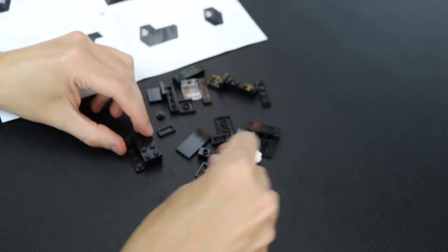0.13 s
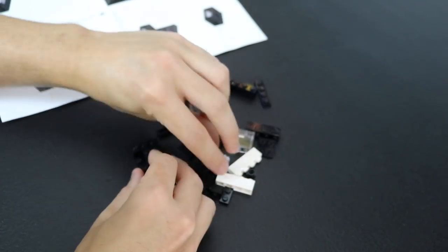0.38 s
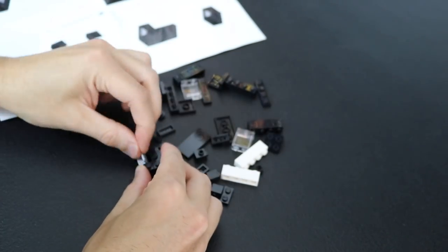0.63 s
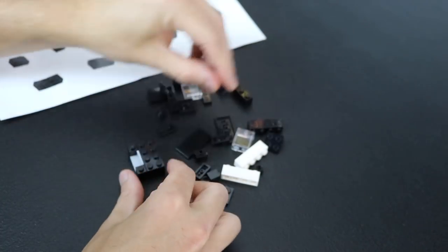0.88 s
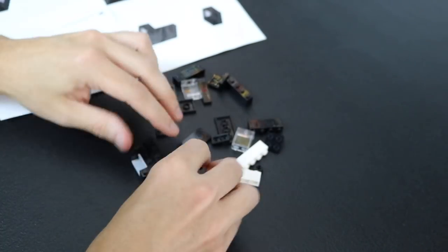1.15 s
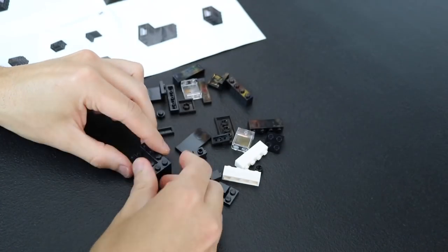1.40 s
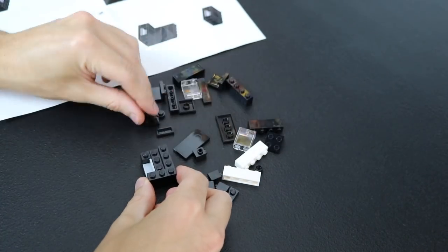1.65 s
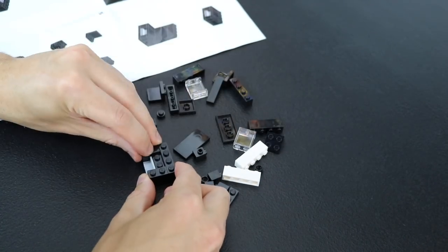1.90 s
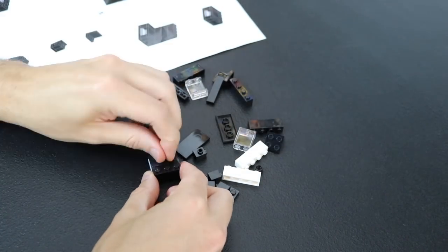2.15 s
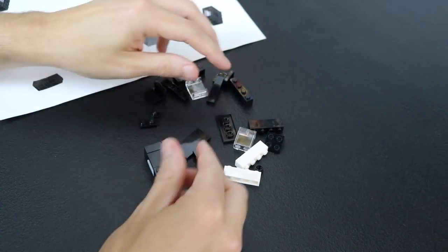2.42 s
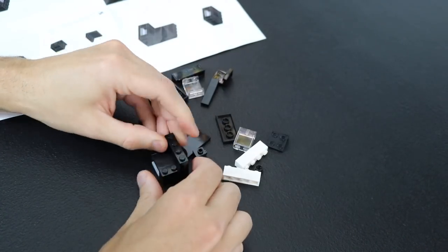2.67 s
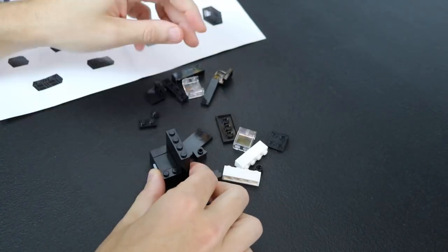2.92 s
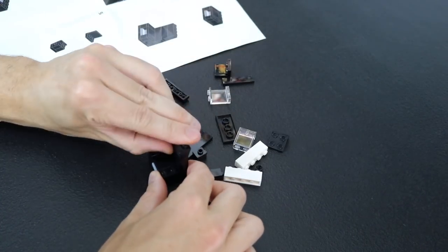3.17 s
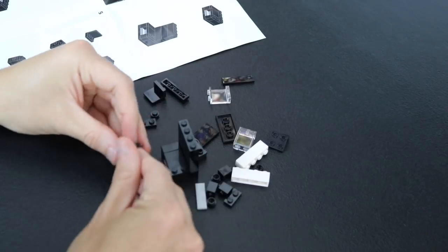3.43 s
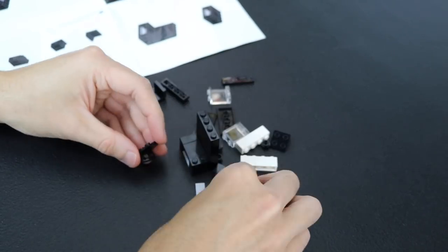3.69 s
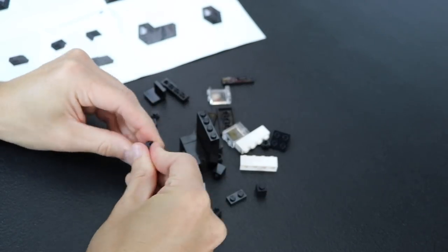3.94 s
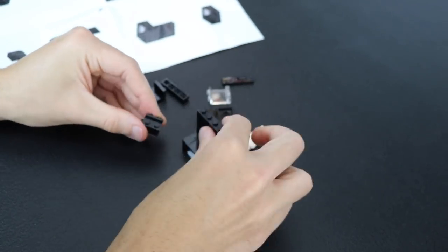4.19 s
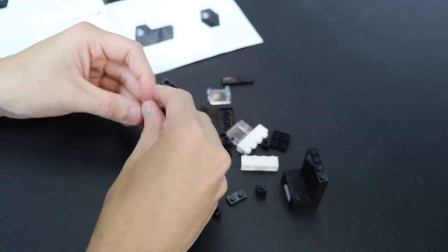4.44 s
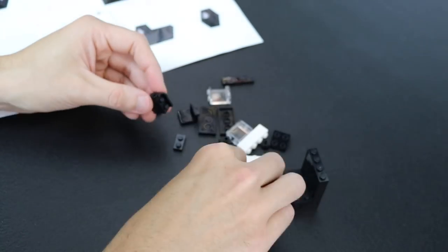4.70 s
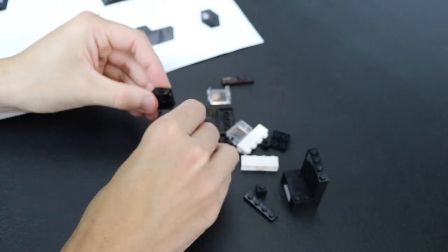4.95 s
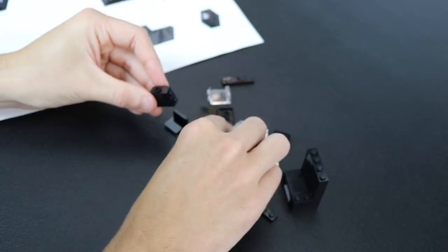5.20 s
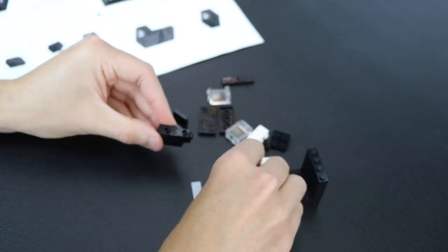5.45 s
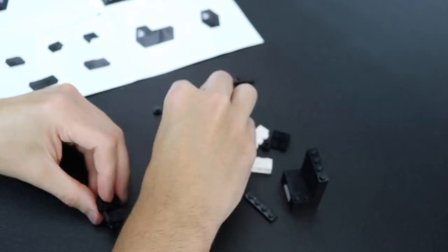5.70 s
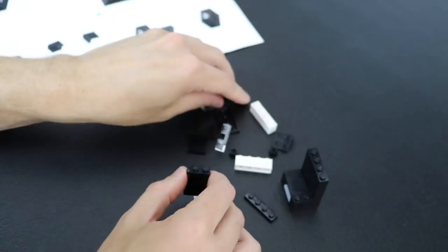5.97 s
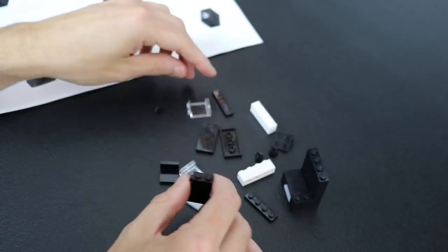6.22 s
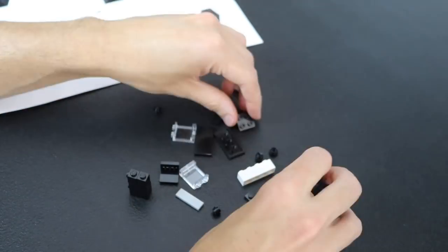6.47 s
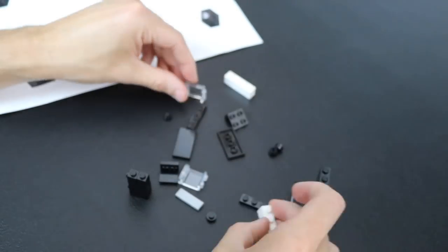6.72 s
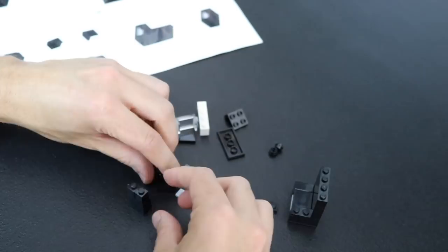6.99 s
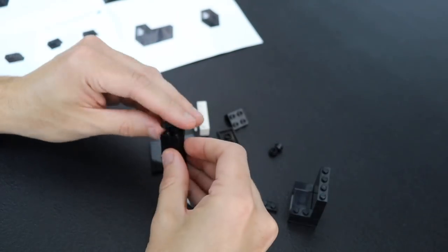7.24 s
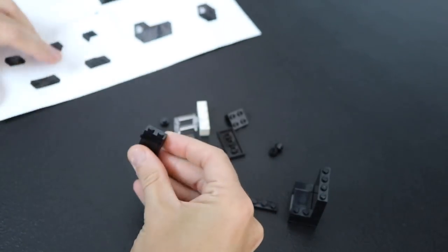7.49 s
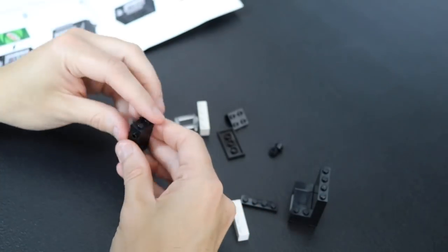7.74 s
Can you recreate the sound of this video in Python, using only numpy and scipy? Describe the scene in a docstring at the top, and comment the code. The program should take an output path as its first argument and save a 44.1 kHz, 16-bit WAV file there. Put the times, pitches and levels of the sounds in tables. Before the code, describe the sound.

Small hollow plastic bricks are handled on a desk, close to one microphone in a quiet room with soft hiss and low rumble. From 0 to 1 s there are faint scrapes and light knocks. At 1.13 s a loud, desk-heavy slam hits, with another clack and soft hand thud near 1.4 s. Weak ticks and short rubs follow, with a snap at 2.6 s. Scraping thickens around 3.1 s, then a cluster of loud clacks at 3.6-3.7 s. Sparse snaps come at 4.5, 5.0 and 5.35 s. A strong knock at 5.95 s with a faint hollow drag hum opens a dense rattle of scrapes, quick bright ticks and clacks until 7 s. After a lull, a piercing, very bright snap lands at 7.47 s, then paper rustles at 7.6 s and its corner taps at 7.7 s. Rings and scrapes cut off abruptly at frequent time jumps; hiss continues.

```python
"""Soft scrapes and small knocks come first, then loud slams and snaps scattered among weaker knocks and scrapes:
hands pick small plastic bricks from a pile, push them over a desk and snap them together, close to one microphone.
Every knock and scrape is a noisy force that rings modes of the hollow bricks and the desk top; thuds, hums and a
rustling page join in. The sound is speeded up by leaving pieces out: rings and scrapes break off at the jumps
while the quiet room hiss runs on."""
import sys
import numpy as np
from scipy import signal
from scipy.fft import rfft, irfft
from scipy.io import wavfile
from scipy.ndimage import uniform_filter1d

SR = 44100
rng = np.random.default_rng(int(sys.argv[2]) if len(sys.argv) > 2 else 0)


def generate_wav(sig):
    """Save sig (samples, or channels by samples) to the path in sys.argv[1] as 16-bit PCM at SR."""
    pcm = np.round(np.clip(np.atleast_2d(sig).T, -1, 1) * 32767).astype(np.int16)
    wavfile.write(sys.argv[1], SR, pcm)


def volts_from_decibels(level):
    """Turn decibel levels (scalar or array-like) into linear amplitude factors."""
    exponent = np.asarray(level, float) / 20
    return 10 ** exponent


N = 347067  # samples in the scene
SPAN = 16384  # samples in one ring
FLUTTER_DB = 2.5  # of scrapes and paper


def unit(x):
    """Scale so that the loudest 2 ms have rms 1."""
    return x / np.sqrt(uniform_filter1d(x ** 2, size=88).max())


def fall(t, t60):
    """Gain that drops 60 dB in t60."""
    return np.exp(-np.log(1000) * t / t60)


def walk(rate, count):
    """Random levels held 1 / rate s and slewed; spread near 1."""
    hold = int(SR / rate)
    levels = rng.standard_normal(count // hold + 1)
    return uniform_filter1d(np.repeat(levels, hold), hold)[:count]


def bank(modes):
    """Spectrum of each damped mode of an object."""
    hz, db, t60 = np.transpose(modes)[:, :, None]
    t = np.arange(SPAN) / SR
    return rfft(volts_from_decibels(db) * fall(t, t60) * np.sin(2 * np.pi * hz * t), axis=1)


def ring(force, spectra):
    """The force rings the object, each mode with the strength and sign of this contact point."""
    scatter_db = 3  # how differently each contact point drives the modes
    chance = rng.standard_normal((2, len(spectra)))
    strengths = volts_from_decibels(scatter_db * chance[0]) * np.sign(chance[1])
    return irfft(rfft(force, SPAN) * (strengths @ spectra))


def drive(force, spectra):
    """Ring the object with a steady force at unit gain, before the scatter of the contact point."""
    return ring(force, spectra) / np.sqrt(2 * np.sum(np.abs(spectra) ** 2) / SPAN)


def soften(force, desk_db):
    """Spread the force over a contact time: the more goes into the desk, the softer and longer it is."""
    soft_s_per_db = .00003
    return uniform_filter1d(force, size=1 + int(max(desk_db, 0) * soft_s_per_db * SR))


# Jumps in time, where whatever rings close to the microphone is cut off. Each entry: time in seconds.
JUMP_TIMES = [.658, .971, 1.067, 1.177, 1.194, 1.283, 1.49, 1.668, 1.771, 2.646, 2.79, 2.935, 3.163, 3.452,
              3.658, 3.671, 3.683, 4.115, 4.488, 4.705, 5.077, 5.332, 5.389, 6.023, 6.32, 6.419, 6.78,
              7.392, 7.476, 7.707]


def add(out, start_s, x):
    """Mix a sound in, broken off within a millisecond at the next jump."""
    i = int(start_s * SR)
    stop = min([s for s in JUMP_TIMES if s > start_s] + [N / SR])
    t = start_s + np.arange(min(len(x), N - i)) / SR
    out[i:i + len(t)] += x[:len(t)] * np.clip((stop - t) / .001, 0, 1)
    return out


# Modes of the desk top, then of the bricks: body, treble and topmost rings.
# Each row: frequency in Hz, relative level in dB (for bricks, before the low cut), 60 dB decay time in seconds.
DESK_MODES = [(146, -17.5, .08), (255, -8, 0.044), (352.7, 1, 0.047), (492, 1, 0.025), (606, 0.5, 0.029),
              (751.4, 3, 0.03), (1013, 5, 0.015), (1338, 1, 0.014), (1760, -7.5, .015)]
BODY_MODES = [(1810, -0.5, 0.003), (2182, -5, 0.00285), (2690, -2, .0035), (3145, 4.5, .006),
              (3420, -1.5, 0.01), (3840, 1, 0.0033), (4780, -0.5, 0.0044), (5550, -4.5, 0.0034),
              (6540, -9.5, 0.0027)]
TREBLE_MODES = [(7100, -6.5, .003), (7500, -0.5, 0.0028), (7850, 23.5, 0.0018), (9126, 7.5, 0.0061),
                (10100, -3.5, 0.002)]
TOP_MODES = [(11700, -8.5, .002), (12560, 4.5, .004), (12500, -2, 0.0026), (14000, -5.5, 0.0022),
             (15140, -9, 0.0025)]


def desk_and_brick_banks():
    """Small bricks radiate little below their low edge, so their modes pass a second-order low cut."""
    brick_low_hz = 446.6
    banks = [bank(m) for m in (DESK_MODES, BODY_MODES, TREBLE_MODES, TOP_MODES)]
    s = 1j * np.arange(SPAN // 2 + 1) * SR / SPAN / brick_low_hz
    low_cut = (s / (1 + s)) ** 2
    banks[1:] = [b * low_cut for b in banks[1:]]
    return banks


def blow(banks, levels_db):
    """Bricks chatter a few ms, then a rattle and room tail; the desk takes one clean push and the tail."""
    chatter_t60_s, tail_t60_s, treble_t60_s = 0.0061, 0.097, 0.081
    tail_db, desk_tail_db = -8, 1.5  # tail under the blow; desk's share of that tail
    t = np.arange(SPAN // 2) / SR
    noise = rng.standard_normal(len(t))
    tail = volts_from_decibels(tail_db) * fall(t, tail_t60_s) * noise
    chatter = fall(t, chatter_t60_s) * noise + tail
    push = 5 * np.exp(-t / 0.00005) + volts_from_decibels(desk_tail_db) * tail
    soft_push = soften(push, levels_db[0] - levels_db[1])
    treble = chatter * fall(t, treble_t60_s)  # the top dies sooner
    parts = zip((soft_push, chatter, treble, treble), banks, levels_db)
    return sum(volts_from_decibels(db) * unit(ring(force, b)) for force, b, db in parts)


# Blows of brick on brick or desk, close to the microphone.
# Each row: start in seconds, brick body level in dB, brick treble level in dB, desk level in dB.
BLOW_ROWS = [(0.1625, -30.5, -61, -52), (0.2504, -44, -56, -55), (0.2802, -30.5, -47, -30.5),
             (.3233, -45.5, -65, -41), (0.4358, -47, -48, -37), (0.4507, -26.5, -40, -30),
             (.5214, -29, -40, -59), (0.56, -40.5, -41.5, -39.5), (0.6279, -44, -64, -44),
             (.655, -42, -58, -45.5), (0.6985, -42.5, -59, -38.5), (.7212, -39.5, -53.5, -37.5),
             (.7885, -42.5, -43.5, -32.5), (.935, -39, -57, -34), (1.0508, -40, -44.5, -40.5),
             (1.1308, -14, -23.5, -4), (1.1448, -30, -21, -26), (1.1902, -43, -50.5, -52),
             (1.2606, -20, -31.5, -53), (1.3118, -47, -59, -34), (1.4047, -29, -20.5, -11),
             (1.4184, -20, -25.5, -21.5), (1.61, -50, -55, -58), (1.6317, -31, -36.5, -48),
             (1.6499, -29.5, -33.5, -59), (1.6943, -36, -55, -58), (1.8016, -33.5, -44, -61),
             (1.8322, -34.5, -46, -60), (1.8478, -32, -48.5, -56), (1.9472, -37, -54, -43),
             (1.9742, -39.5, -44, -34.5), (2.1051, -35, -67, -46), (2.4811, -45, -48, -32),
             (2.5643, -36, -60, -47), (2.594, -16, -24, -30.5), (2.606, -27.5, -29, -34.5),
             (2.7329, -54, -68, -32), (2.8459, -45.5, -58, -35.5), (2.933, -26.5, -52, -31),
             (3.0315, -37.5, -49, -32), (3.069, -26.5, -39, -40), (3.092, -37, -50, -37),
             (3.1387, -40, -52, -33), (3.1706, -37, -49, -30), (3.2097, -28, -47.5, -25),
             (3.3453, -55, -56.5, -36.5), (3.6177, -28, -34, -36.5), (3.6346, -11, -22, -20),
             (3.667, -33, -36.5, -50), (3.6802, -35, -40.5, -55), (3.691, -17, -27, -30),
             (3.7122, -22, -21, -32), (3.716, -15, -30, -24.5), (3.77, -25, -41, -43),
             (4.111, -45.5, -34, -64), (4.3934, -46.5, -48.5, -51), (4.4258, -35.5, -34, -48),
             (4.447, -35.5, -40.5, -52), (4.4838, -15.5, -28, -62), (4.6956, -31, -52, -45),
             (4.997, -16.5, -27.5, -33.5), (5.0138, -32, -40, -31.5), (5.0432, -26.5, -37.5, -39),
             (5.1562, -56, -48, -65), (5.3063, -27, -42, -37), (5.3271, -34, -42.5, -44),
             (5.343, -15, -19.5, -32.5), (5.366, -19, -31, -31.5), (5.95, -10.5, -30, -24),
             (6.084, -33.5, -41, -45), (6.0941, -24, -34, -37), (6.153, -37.5, -33, -45),
             (6.2346, -25, -47.5, -31), (6.2522, -21, -60, -42), (6.3561, -22, -36, -34),
             (6.4641, -37, -44, -50), (6.4782, -23, -44, -47), (6.5307, -37.5, -32.5, -40),
             (6.5475, -42, -57, -29), (6.5628, -32, -35, -40), (6.5765, -26.5, -31.5, -31),
             (6.589, -29.5, -30, -21), (6.7766, -31.5, -54, -48), (6.8971, -27, -48, -41),
             (6.9384, -16, -21, -34), (7.3893, -53, -28, -68), (7.4718, -19.5, -3.5, -35)]


def knocks(banks):
    """Each blow rings desk and bricks; the topmost ring grows faster than treble or desk level."""
    top_db, top_steepness = -1.5, 1.85  # from the treble
    slam_top_db, slam_steepness = -6.5, 3  # from a slam on the desk
    out = np.zeros(N)
    for start, body_db, treble_db, desk_db in BLOW_ROWS:
        from_treble_db = top_db + top_steepness * treble_db
        from_slam_db = slam_top_db + slam_steepness * desk_db
        add(out, start, blow(banks, (desk_db, body_db, treble_db, max(from_treble_db, from_slam_db))))
    return out


def skipping_piece(banks):
    """A tiny piece skips stud to stud over another: even, very bright ticks."""
    start_s, every_s, skips = 6.1031, .0096, 3
    desk_db, body_db, treble_db, top_db = -41, -22.5, -21.5, -18
    out = np.zeros(N)
    for k in range(skips):
        add(out, start_s + k * every_s, blow(banks, (desk_db, body_db, treble_db, top_db)))
    return out


# Scrapes over the desk and over other bricks.
# Each row: start in seconds, end in seconds, brick body level in dB at the start, at the end, desk dB above body.
SCRAPE_ROWS = [(.055, 0.092, -64.5, -70, 21), (0.119, 0.17, -64, -63, 9), (0.176, 0.268, -54, -63, 0.5),
               (0.435, 0.507, -43.5, -39, -7), (0.501, 0.581, -43.5, -55, -0.5), (.737, 0.79, -75, -72, 25),
               (0.788, 0.824, -55, -66, 16.5), (.918, 0.973, -57, -46, 4.5),
               (1.144, 1.177, -27, -30.5, -21), (1.199, 1.239, -43, -44, -7.5),
               (1.234, 1.28, -32.5, -40.5, -8), (1.355, 1.396, -57, -73.5, 10.5),
               (1.424, 1.487, -39.5, -51, 7.5), (1.563, 1.588, -59.5, -54.5, 9),
               (1.634, 1.663, -42, -53, 0.5), (1.696, 1.771, -35.5, -49.5, -16.5),
               (1.831, 1.866, -40.5, -51.5, -17), (1.937, 1.963, -47.5, -48, 0.5),
               (2.096, 2.156, -52.5, -51.5, 0), (2.521, 2.589, -50, -46, -1), (2.619, 2.645, -49, -42, -7),
               (2.654, 2.719, -66, -64, 14), (2.74, 2.79, -65.5, -62, 16.5), (2.85, 2.93, -62, -55, 12),
               (2.965, 3.01, -62, -71, 13), (3.055, 3.113, -42.5, -40.5, 1), (3.11, 3.164, -44, -46, 2),
               (3.258, 3.324, -54.5, -75.5, 10), (3.347, 3.449, -75, -51.5, -0.5),
               (3.572, 3.62, -43.5, -40.5, -6), (3.62, 3.654, -38.5, -45, -11),
               (3.659, 3.668, -40, -42, -1), (3.726, 3.77, -40.5, -39, 3), (3.77, 3.832, -38.5, -64, -10),
               (4.394, 4.479, -51.5, -52.5, -5), (4.709, 4.773, -53.5, -59, -9),
               (5.001, 5.077, -36.5, -48.5, -2.5), (5.51, 5.586, -48, -45.5, -0.3),
               (5.753, 5.856, -62, -51.5, -10.5), (5.879, 5.942, -50, -49, -5.5),
               (6.026, 6.08, -47.5, -54, 5), (6.076, 6.126, -38, -33, -10), (6.138, 6.23, -32, -59, -7),
               (6.233, 6.335, -35, -43.5, 0), (6.334, 6.358, -48.5, -36, -2.2),
               (6.36, 6.425, -35, -45, -3.5), (6.421, 6.47, -60, -55.5, -3),
               (6.465, 6.546, -36, -41.5, -0.5), (6.593, 6.643, -48.5, -62.5, 20.5),
               (6.644, 6.675, -60, -56.5, 17), (6.664, 6.727, -41.5, -46.5, -9),
               (6.716, 6.754, -40.5, -35, -6.5), (6.753, 6.776, -42, -43, -7), (6.872, 6.937, -38, -32, -7),
               (6.948, 7.002, -34, -55, 0.5)]


def scrapes(banks):
    """Studs and edges catching on the desk and on each other: uneven ticks over a rub that swells and flutters."""
    grains_per_s, grain_spread_db, swell_db, rub_db = 400., 4., 3., 3.5
    treble_db, top_db = -15.5, -10.5  # treble under the body, top under the treble
    out, most = np.zeros(N), SPAN // 2
    for start, end, from_db, to_db, desk_db in SCRAPE_ROWS:
        n = int((end - start) * SR)
        chance = rng.random((2, most))
        tick_now = chance[0] < grains_per_s / SR
        ticks = tick_now * volts_from_decibels(-grain_spread_db * np.log(chance[1] + 1e-9)) * 4
        rub = volts_from_decibels(rub_db + FLUTTER_DB * walk(91, count=most)) * rng.standard_normal(most)
        force = (ticks + rub) / np.std(ticks + rub) * volts_from_decibels(swell_db * walk(38, count=most))
        # ease in and out over 2.6 ms
        ease = np.minimum(1, np.minimum(np.arange(n), np.arange(n)[::-1]) / SR / 0.0026)
        force = force[:n] * ease * volts_from_decibels(np.linspace(from_db, to_db, n))
        shares_db = desk_db, 0, treble_db, treble_db + top_db
        forces = soften(force, desk_db), force, force, force
        add(out, start, sum(volts_from_decibels(db) * drive(f, b) for f, b, db in zip(forces, banks, shares_db)))
    return out


def shake(rows, modes):
    """A steady noise force shakes a few modes from start to end of each row, then they ring out."""
    out, spectra = np.zeros(N), bank(modes)
    for start, end, db in rows:
        force = rng.standard_normal(SPAN // 2)[:int((end - start) * SR)]
        add(out, start, volts_from_decibels(db) * drive(force, spectra))
    return out


# Hand and wrist landing on the desk. Each row: start in seconds, end in seconds, level in dB.
THUD_ROWS = [(0.05, 0.124, -51.5), (0.28, 0.361, -51), (0.75, 0.817, -52), (1.132, 1.177, -49),
             (1.413, 1.49, -34), (1.957, 2.01, -48), (3.14, 3.196, -42), (3.255, 3.339, -43.5),
             (6.554, 6.67, -56)]
# Low modes of the desk slab. Each row: frequency in Hz, relative level in dB, 60 dB decay time in seconds.
SLAB_MODES = [(42, -2, 0.19), (85.6, -4.5, .1), (140, 1.5, 0.074), (202, 1.5, .08)]


def thuds():
    """The weight of hand and wrist softly shakes the low modes of the desk slab."""
    return shake(THUD_ROWS, SLAB_MODES)


# A hollow piece dragged over the desk. Each row: start in seconds, end in seconds, level in dB.
HUM_ROWS = [(5.925, 6.02, -46), (6.035, 6.085, -51)]
# Modes of that piece. Each row: frequency in Hz, relative level in dB, 60 dB decay time in seconds.
HOLLOW_MODES = [(690, 0, 0.13), (850, -6, .1)]


def hums():
    """A hollow piece hums at its two modes while it is dragged."""
    return shake(HUM_ROWS, HOLLOW_MODES)


# A booklet page sliding on the desk. Each row: time in seconds, level in dB of the noise through the band.
PAGE_LEVELS = [(7.49, -74), (7.53, -47.5), (7.58, -44), (7.605, -29.5), (7.63, -45), (7.7, -43)]


def page():
    """Paper has no ring of its own: a broad, fluttering rustle."""
    out = np.zeros(N)
    s, db = np.transpose(PAGE_LEVELS)
    t = np.arange(s[0], s[0] + .25, 1 / SR)
    band = signal.butter(1, (1500, 8500), "bandpass", fs=SR, output="sos")
    rustle = signal.sosfilt(band, rng.standard_normal(len(t)))
    rustle = rustle * volts_from_decibels(FLUTTER_DB * walk(110, count=len(t)))
    return add(out, s[0], volts_from_decibels(np.interp(t, s, db)) * rustle)


# Modes of the page's corner. Each row: frequency in Hz, relative level in dB, 60 dB decay time in seconds.
CORNER_MODES = [(1320, 2.5, 0.0088), (2550, -4, 0.0088), (4730, -4, .004)]


def page_tap():
    """The page's corner drops on the desk: a single impulse rings its modes."""
    start_s, level_db = 7.7028, -25
    tap = unit(ring(np.ones(1), bank(CORNER_MODES)))
    return add(np.zeros(N), start_s, volts_from_decibels(level_db) * tap)


def coloured(points):
    """Spectrum of a noise with this colour, and its frequencies."""
    hz = np.arange(N // 2 + 1) * SR / N + 1  # 1 Hz up, to keep the logarithm finite
    point_hz, point_db = np.transpose(points)
    colour_db = np.interp(np.log(hz), np.log(point_hz), point_db)
    return hz, volts_from_decibels(colour_db) * rfft(rng.standard_normal(N))


# Colour of the hiss and room rumble. Each row: frequency in Hz, relative level in dB per Hz.
HISS_COLOUR = [(15, -27), (25, -4), (59, -16), (125, -15), (184, -18.5), (324, -22), (361, -23), (513, -26),
               (1470, -32), (15800, -37.5)]


def room():
    """Microphone hiss and a low room rumble that sways."""
    level_db, rumble_hz, sway_db = -54, 240, 3.5
    hz, spectrum = coloured(HISS_COLOUR)
    low = 1 / (1 + (hz / rumble_hz) ** 2)
    hiss = irfft(spectrum * (1 - low), N)
    rumble = volts_from_decibels(sway_db * walk(3.0, count=N)) * irfft(spectrum * low, N)
    x = hiss + rumble
    return volts_from_decibels(level_db) * x / np.std(x)


# Colour of the hiss unlike left and right. Each row: frequency in Hz, relative level in dB per Hz.
SIDE_COLOUR = [(15, -39), (25, -3), (189, -4), (15800, -5)]


def side_hiss():
    """Quiet noise that goes with opposite sign to left and right."""
    level_db = -62.5
    side = irfft(coloured(SIDE_COLOUR)[1], N)
    return volts_from_decibels(level_db) * side / np.std(side)


def scene():
    """One microphone feeds both channels; only the side hiss differs between them."""
    banks = desk_and_brick_banks()
    mid = knocks(banks) + skipping_piece(banks) + scrapes(banks)
    mid = mid + thuds() + hums() + page() + page_tap() + room()
    side = side_hiss()
    return np.array([mid + side, mid - side])


def top_cut(x):
    """Nothing passes above the cut-off."""
    return signal.sosfilt(signal.butter(12, 16010, fs=SR, output="sos"), x)


def record(dry):
    """Peaks are clipped at 0.93 of full scale."""
    mix = np.clip(dry, -.93, .93)
    return top_cut(mix)


dry = scene()
out = record(dry)
generate_wav(out)
```